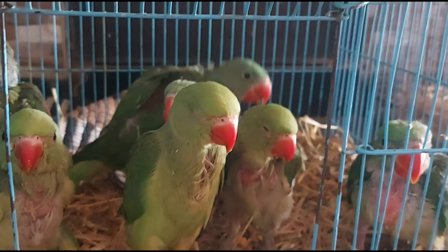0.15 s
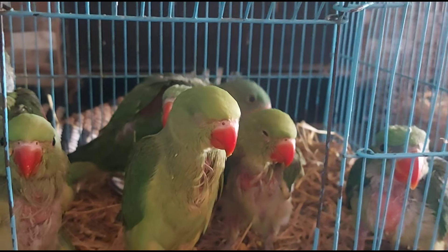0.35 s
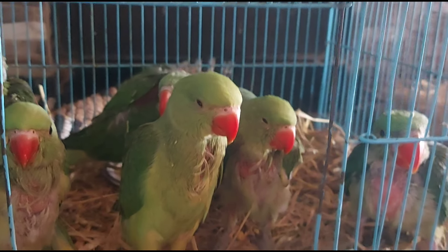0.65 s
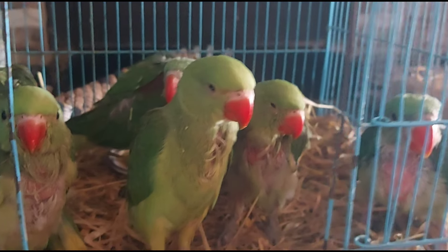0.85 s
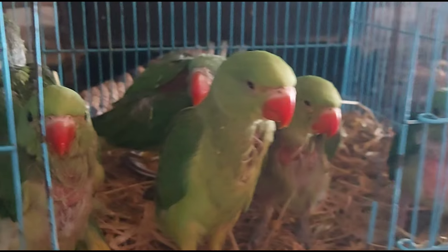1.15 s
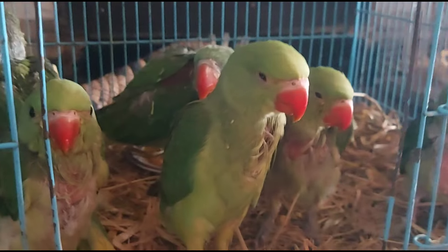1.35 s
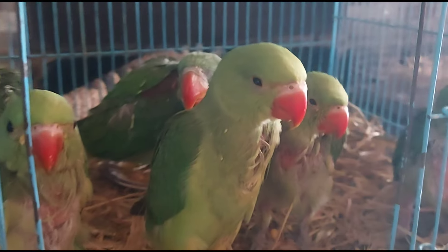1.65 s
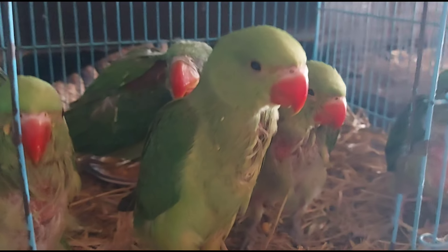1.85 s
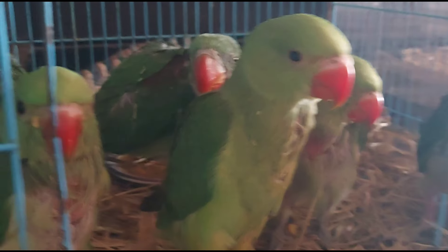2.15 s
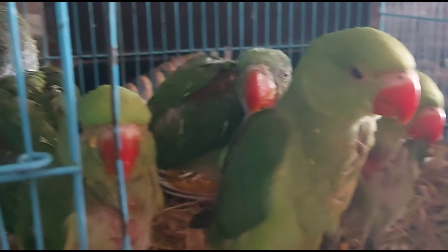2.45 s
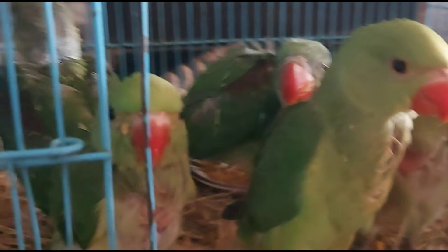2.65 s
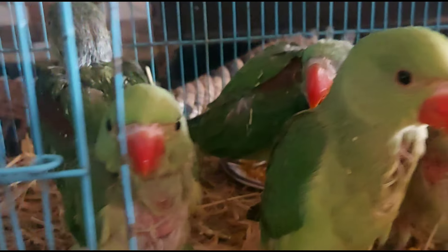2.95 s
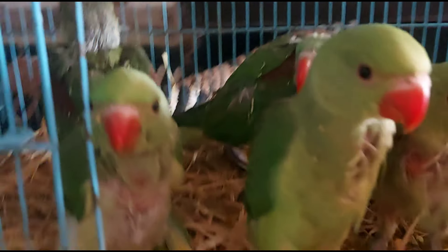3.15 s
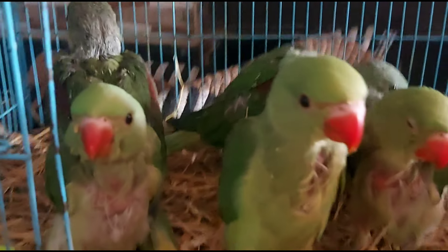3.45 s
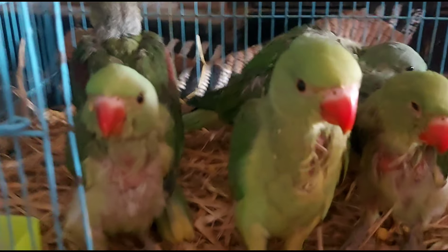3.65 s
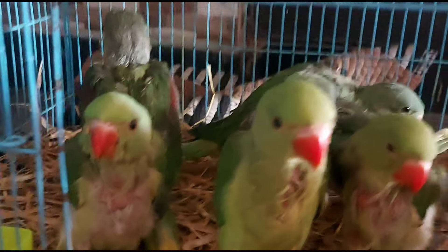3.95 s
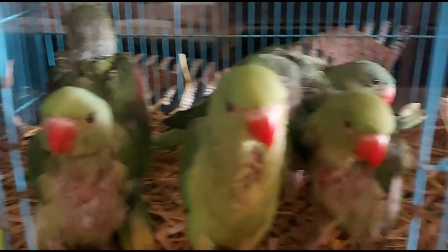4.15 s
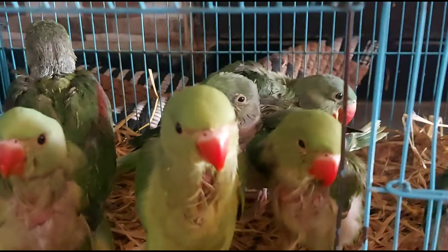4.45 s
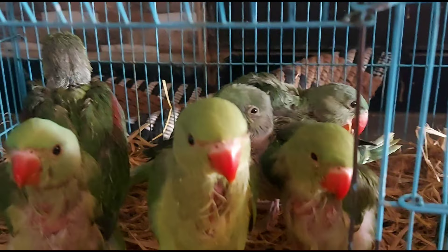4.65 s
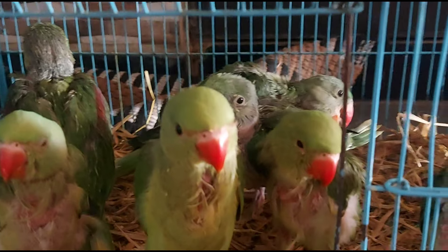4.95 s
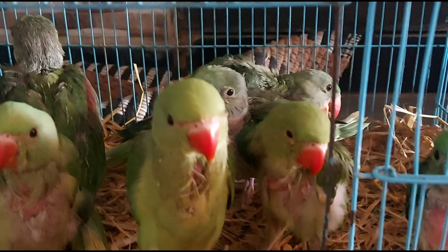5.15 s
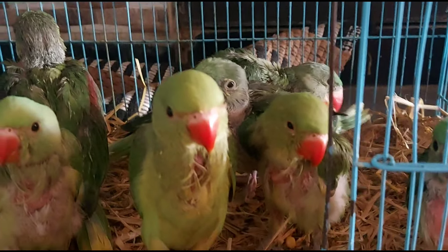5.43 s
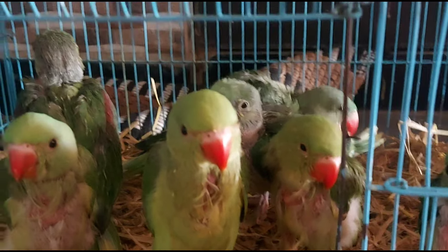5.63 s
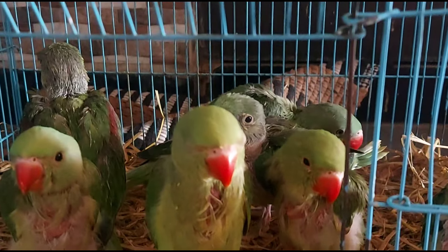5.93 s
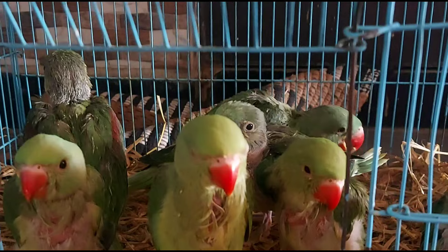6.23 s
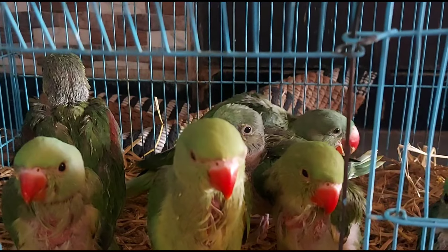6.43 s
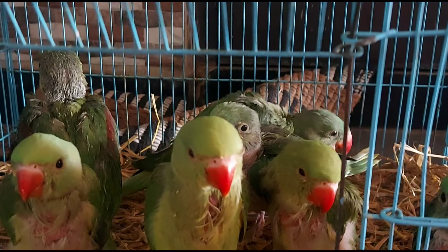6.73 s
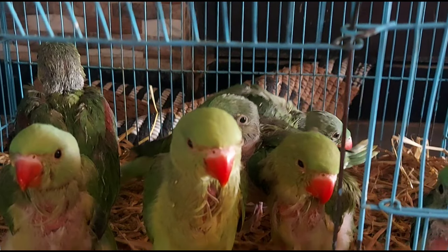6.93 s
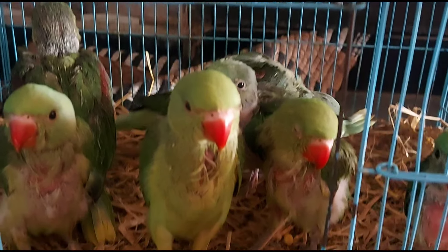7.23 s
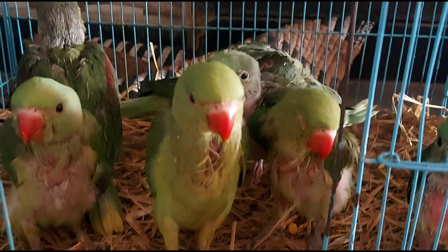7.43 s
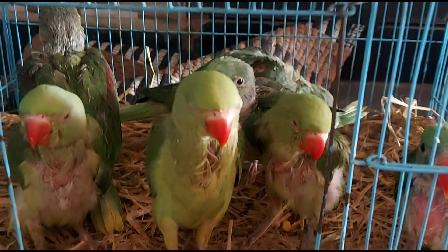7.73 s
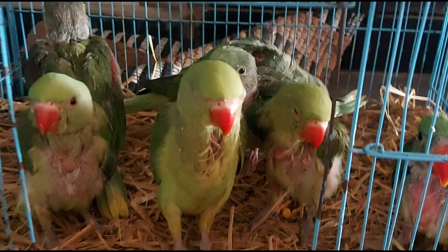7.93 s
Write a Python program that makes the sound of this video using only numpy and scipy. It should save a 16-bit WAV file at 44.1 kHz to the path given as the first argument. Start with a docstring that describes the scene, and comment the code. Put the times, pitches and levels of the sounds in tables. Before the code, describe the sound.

A low fan hum around 100 Hz with soft rushing air continues throughout a reverberant indoor room. At about 0.5, 0.75 and 1.0 seconds a parakeet farther off gives three hoarse squawks, each scooping up, holding briefly and falling, the first cracking into a yelp. From 1.4 to 3.1 seconds beaks tick lightly on the cage, with gritty little scrapes and thin wire rings, sharpest near 2.65 and 2.9, among very faint gliding peeps. Between 3.9 and 4.8 a weak, breathy two-voiced begging rasp wavers with a few more ticks. At 4.85 a close bird flicks upward into a piercing, very loud screech that slides down, followed by a shorter, softer one at 5.1. The background ducks, then creeps back. The distant three-note phrase repeats from 6.0 to 6.8, quieter and duller, leaving only wavering fan hum until about 8 seconds.

```python
"""A young parakeet close by screeches twice, and the recorder's gain ducks and creeps back.
A bird across the hard-walled room gives the same harsh three-note phrase twice.
Chicks beg and peep, beaks tick and set cage wires ringing, and a fan hums and rushes behind.
The birds' calls are stacks of harmonics coloured by a throat; ticks and air are filtered noise;
the peeps, the wires and the hum are sine waves."""
import sys
import numpy as np
from scipy import signal
from scipy.fft import rfft, irfft, next_fast_len
from scipy.io import wavfile
from scipy.ndimage import uniform_filter1d, minimum_filter1d, map_coordinates

SR = 44100
rng = np.random.default_rng(int(sys.argv[2]) if len(sys.argv) > 2 else 0)


def dump(signal):
    """Clip the signal to [-1, 1] and save it as 16-bit WAV at the path in sys.argv[1]."""
    limited = np.clip(np.atleast_2d(signal).T, -1, 1)
    pcm = np.round(limited * 32767).astype(np.int16)
    wavfile.write(sys.argv[1], SR, pcm)


N = 356636  # length of the scene in samples

# In all tables, levels are those before the room is added.
# The close bird's screeches: start_s, hold_s, fall_s, held_pitch_hz, end_pitch_hz, level_db,
# fade_over_fall_db, held_rasp (0-1)
SCREECHES = [(4.869, .047, .092, 2403, 1417, -2, 11.5, 0.05),
             (5.152, .012, .104, 2448, 1455, -7, 9.5, 0.16)]
# Quick flicks that lead into them: start_s, length_s, start_pitch_hz, end_pitch_hz, level_db, rasp (0-1)
LEAD_IN_FLICKS = [(4.822, 0.04, 827, 2475, -18, 0.66), (4.859, 0.012, 1900, 1565, -7.5, .1),
                  (5.101, 0.013, 1310, 1300, -22.5, 0.65), (5.114, 0.02, 963, 2296, -10.5, 0.4)]
# How the close bird shapes a note, clear and abrupt: named settings of held_note
CLOSE_MANNER = dict(ease=.75, scoop=0, onset_rasp=.05, settle_s=0.0055, fall_rasp=0.17, attack_s=0.0027, release_s=.008, flutter_db=1.85)
# What the close bird's throat lets through: frequency_hz, relative_level_db
CLOSE_THROAT = [(700, -1.5), (1500, -15.5), (2400, -6), (3300, 4.5), (4800, -2.5), (5400, -8), (6200, 0),
                (7300, -8.5), (8500, -8), (9700, -23), (11000, -19.5), (12200, -19.5), (13200, -41),
                (15000, -19)]


def near_bird():
    """Each screech starts with quick flicks, holds a clear note and slides down ever faster."""
    out = np.zeros((2, N))
    notes = [(start_s, held_note(*shape, **CLOSE_MANNER)) for start_s, *shape in SCREECHES]
    flicks = [(start_s, flick(*shape)) for start_s, *shape in LEAD_IN_FLICKS]
    for start_s, gesture in notes + flicks:
        note = call(gesture, CLOSE_THROAT, jitter=0.096, breath=0.22, split_db=-22, odd_db=-9.5)
        add(out, start_s, room(note, direct_db=-1.5, wet_db=-2.0, right_db=11.0, lag_s=0.00022, early=2.7))
    return out


# When the phrase is heard: start_s, level_change_db, growth_per_note_db, brightness_db_per_octave
PHRASE_REPEATS = [(.467, 1, -0.45, 1.1), (6.031, -1.5, 1.5, -1)]
# The three notes: start_in_phrase_s, hold_s, fall_s, held_pitch_hz, end_pitch_hz, level_db,
# fade_over_fall_db, held_rasp (0-1); each repeat then shifts the levels
PHRASE_NOTES = [(.001, .086, .060, 2285, 1677, -21.5, 3, .58),
                (.282, .050, .125, 2442, 1383, -24.5, 4, 0.43),
                (.541, .042, .122, 2315, 1350, -21, 5.5, 0.28)]
# The yelp that the first note cracks into: start_in_phrase_s, length_s, start_pitch_hz, end_pitch_hz
YELP = (.047, .036, 1830, 1660)
# How the far bird shapes a note, hoarse and scooping up: named settings of held_note
HOARSE_MANNER = dict(ease=1.8, scoop=.07, onset_rasp=.6, settle_s=.016, fall_rasp=.45, attack_s=0.016, release_s=0.025, flutter_db=2)
# What the far bird's throat lets through, before each repeat's brightness: frequency_hz, relative_level_db
HOARSE_THROAT = [(1000, -24), (1750, -11.5), (2300, -4), (2800, 5), (3080, 2.5), (3450, 7), (4600, -1.5),
                 (5300, -6.5), (6000, 4), (6900, -3), (7600, -2.5), (8800, -11.5), (9700, -28),
                 (11800, -15.5), (15500, -48)]


def far_bird():
    """Three harsh notes that scoop up, hold and fall, heard mostly by way of the walls."""
    out = np.zeros((2, N))
    for start_s, change_db, growth_db, bright_db in PHRASE_REPEATS:
        throat = [(hz, level_db + bright_db * np.log2(hz / 3500)) for hz, level_db in HOARSE_THROAT]
        notes = []
        for k, (note_s, *shape) in enumerate(PHRASE_NOTES):
            notes.append((note_s, change_db + k * growth_db, held_note(*shape, **HOARSE_MANNER)))
        yelp_s, *glide = YELP
        notes.append((yelp_s, change_db, flick(*glide, db=-16, rasp=0.19)))
        for note_s, note_db, gesture in notes:
            note = call(gesture, throat, jitter=0.0586, breath=0.46, split_db=-10.5, odd_db=-6.0)
            note = amp(note_db) * note
            heard = room(note, direct_db=-4.5, wet_db=-1.5, right_db=8.0, lag_s=0.0004, early=0.5)
            add(out, start_s + note_s, heard)
    return out


# A begging rasp, one voice from each side of the syrinx (a bird's voice box): time_s, relative_effort_db
LOW_VOICE = [(3.89, -43), (3.906, -38), (3.948, -31.5), (4.18, -38), (4.21, -34), (4.358, -38.5),
             (4.464, -34), (4.728, -42), (4.8, -49.5)]
HIGH_VOICE = [(3.93, -41), (4.042, -46), (4.048, -51), (4.2, -37), (4.34, -46.5), (4.392, -32.5),
              (4.53, -45)]
# What a chick's throat lets through: frequency_hz, relative_level_db
SMALL_THROAT = [(2000, -20), (2750, -12), (3150, 3), (4000, -4.5), (4700, -10.5), (5400, -21.5),
                (6600, -12), (7500, -25), (10000, -40), (11900, -24), (13000, -52)]
# Faint peeps: start_s, length_s, start_pitch_hz, end_pitch_hz, level_db
FAINT_PEEPS = [(1.625, .05, 2640, 2500, -43), (1.748, .07, 5660, 5330, -42), (1.76, .06, 6700, 6650, -45),
               (1.856, .07, 7160, 7700, -48), (1.954, .04, 6140, 5950, -44),
               (1.957, 0.057, 2630, 2540, -41.5), (2.068, 0.089, 7500, 7600, -42),
               (2.20, 0.055, 6000, 5750, -45), (2.21, .08, 2600, 2500, -40),
               (2.381, 0.048, 1860, 1700, -40), (2.516, 0.047, 5440, 5950, -41),
               (2.656, 0.062, 7400, 7900, -38), (2.76, 0.064, 6260, 6500, -44),
               (2.89, .05, 7400, 7150, -38), (3.129, 0.051, 5155, 4970, -35)]


def chicks():
    """A long two-voiced begging rasp, and thin gliding peeps."""
    out = np.zeros(N)
    low = beg(LOW_VOICE, start_hz=3210, sag_hz_per_s=100, db=-0.5, rasp=0.443, clearing_per_db=0.13)
    high = beg(HIGH_VOICE, start_hz=4100, sag_hz_per_s=280, db=-0.5, rasp=0.15, clearing_per_db=0)
    add(out, LOW_VOICE[0][0], call(low, SMALL_THROAT, jitter=0.0595, breath=0.74, split_db=-6))
    add(out, HIGH_VOICE[0][0], call(high, SMALL_THROAT, jitter=0.09, breath=0.56, split_db=-16))
    for start_s, length_s, start_hz, end_hz, db in FAINT_PEEPS:
        n = int(length_s * SR)
        pitch = np.linspace(start_hz, end_hz, n) * (1 + 0.013 * wobble(595, n))
        peep = np.sin(2 * np.pi * np.cumsum(pitch) / SR)
        add(out, start_s, amp(db) * np.hanning(n) * peep)
    return room(out, direct_db=-7.5, wet_db=0.5, right_db=18.5, lag_s=0.0003)[:, :N]


# Beaks ticking in the cage: start_s, level_db, scrape_decay_s
BEAK_TICKS = [(1.362, -30.5, 0.0099), (1.458, -37, 0.048), (1.617, -42, 0.024), (1.714, -40, 0.012),
              (1.757, -39.5, 0.017), (1.87, -41.5, 0.026), (1.957, -36, 0.014), (2.056, -44, 0.14),
              (2.195, -34, 0.022), (2.339, -41.5, 0.024), (2.415, -42, 0.017), (2.526, -34.5, 0.029),
              (2.648, -27, 0.014), (2.757, -36, .02), (2.79, -42, .015), (2.88, -25.5, 0.01),
              (3.125, -33.5, 0.018), (3.853, -37, 0.059), (4.491, -38, 0.016), (4.571, -40, 0.025),
              (4.68, -37.5, 0.018)]
# Colour of the scrape: frequency_hz, relative_level_db
SCRAPE_COLOUR = [(1200, -33), (2200, 5), (2650, 7), (3100, 0), (5000, 3.5), (7600, 4), (9200, -5),
                 (12000, 4), (16000, -6)]
# Cage wires, varied a little from tick to tick: pitch_hz, relative_level_db, time_to_fall_60_db_s
CAGE_WIRES = [(2610, -6, 0.19), (2645, -1, 0.15), (3120, -2, 0.1), (3740, -8, 0.23), (5960, -14, .2),
              (6030, -9.5, 0.203), (6600, -9, 0.18), (7400, -4.5, 0.22), (7800, -11, 0.22),
              (12200, -22.5, .12)]


def beaks():
    """Each tick is a brief gritty scrape that sets the wires ringing and wakes the room."""
    out = np.zeros((2, N))
    t = np.arange(SR // 4) / SR
    for start_s, db, decay_s in BEAK_TICKS:
        grit = noise(SCRAPE_COLOUR, len(t)) * amp(3.1 * wobble(600, len(t))) * np.exp(-t / decay_s)
        ring = np.zeros(len(t))
        for hz, level_db, t60 in CAGE_WIRES:
            decay = amp(level_db + rng.normal(0, 5.8) - 60 * t / t60)
            ring += decay * np.sin(2 * np.pi * hz * rng.normal(1, 0.0143) * t)
        # hard ticks add mostly crack: in dB, the ring grows only half as fast
        tick = amp(db) * grit + amp(db / 2 - 27.0) * ring
        tick *= 1 - np.exp(-t / 0.00048)  # soften the very start
        add(out, start_s, room(tick, direct_db=-5, wet_db=1, right_db=7.5, lag_s=0.0005))
    return out


# Fan motor tones, before swell and wobble: pitch_hz, level_db
MOTOR_HUM = [(100, -38.5), (199.6, -50.5), (299.8, -48)]
# The hum drifts as the microphone moves through the room: time_s, level_change_db
HUM_DRIFT = [(0, 1.5), (1.2, -1), (1.7, -5.5), (2.6, 0.5), (4.4, 0), (5.3, 0.5), (6.7, 1.5), (7.3, -1.5),
             (8.1, -6)]
# Colour of the fan's rush: frequency_hz, relative_level_db
AIR_RUSH = [(15, -82.5), (25, -45), (32, -39), (49, -11), (92, -1.5), (110, -5.5), (128, -12.5),
            (198, -11.5), (243, -12.5), (297, -8), (437, -14), (470, -14), (830, -11), (1460, -19),
            (2000, -27.5), (2600, -35), (4400, -120)]
# Colour of a brighter hiss: frequency_hz, relative_level_db
BRIGHT_HISS = [(880, -20), (1500, -7.5), (1780, -1.5), (2880, -4.5), (3730, -9), (4160, -11), (7920, -14),
               (9370, -26), (13100, -17), (16000, -29)]
# How alike the noise is on left and right: frequency_hz, likeness (1 is identical, 0 unrelated)
LEFT_RIGHT_LIKENESS = [(30, 0.51), (80, 0.95), (150, 0.95), (280, 0.81), (550, 0.52), (1100, -0.13),
                       (2500, -0.076)]
# Balance of hum and noise, mostly leaning right: frequency_hz, left_minus_right_db
LEFT_RIGHT_LEAN = [(60, -0.5), (110, -2.5), (200, -0.5), (380, -0.5), (700, -1.0), (1290, -1.0),
                   (2380, -1.5), (4400, -5.5), (8120, -8.5), (15000, 4)]


def fan():
    """Motor hum is a few wavering sines; rushing air is noise, most alike left and right in the bass."""
    t = np.arange(N) / SR
    drift_s, drift_db = np.transpose(HUM_DRIFT)
    swell_db = np.interp(t, drift_s, drift_db)
    hum = np.zeros(N)
    for hz, db in MOTOR_HUM:
        level = amp(db + swell_db + 2.44 * wobble(4.4, N))
        hum += level * np.sin(2 * np.pi * hz * t + 0.27 * wobble(5, N))

    def angle(hz):
        """Mixing angle between the shared and opposed noise that gives the wanted likeness."""
        return np.arccos(np.clip(along(LEFT_RIGHT_LIKENESS, hz), -1, 1)) / 2

    shared, opposed = [amp(-35.5) * noise(AIR_RUSH, N) + amp(-44.0) * noise(BRIGHT_HISS, N)
                       for _ in range(2)]
    shared = filtered(shared, lambda hz: np.cos(angle(hz))) + hum
    opposed = filtered(opposed, lambda hz: np.sin(angle(hz)))
    stereo = np.array([shared + opposed, shared - opposed])
    return filtered(stereo, lambda hz: amp(np.outer([0.5, -0.5], along(LEFT_RIGHT_LEAN, hz))))


# How long the echo lasts: frequency_hz, time_to_fall_60_db_s
ECHO_TIME = [(300, 0.37), (3200, 0.64), (5000, 0.54), (7500, 0.5), (14000, 0.35)]


def room(x, direct_db, wet_db, right_db, lag_s, early=0.86):
    """Direct sound, louder on the right but earlier on the left, plus cage, floor and wall echoes."""
    hz, t, z = signal.stft(rng.standard_normal((2, int(0.7 * SR))), SR, nperseg=256)
    decay = amp(-60 * t / along(ECHO_TIME, hz)[:, None])
    # cage and floor answer early, the walls with a diffuse tail
    swell = (1 - np.exp(-t / 0.0014)) * (1 + early * np.exp(-t / 0.021))
    tail = signal.istft(z * decay * swell, SR, nperseg=256)[1]
    tail /= np.linalg.norm(tail[0])
    out = amp(wet_db) * signal.fftconvolve(x[None], tail, axes=1) * amp([[-1.2], [1.2]])
    add(out[0], 0, amp(direct_db - right_db / 2) * x)
    add(out[1], lag_s, amp(direct_db + right_db / 2) * x)
    return out


def call(gesture, throat, jitter, breath, split_db, odd_db=-6):
    """One note: syrinx harmonics through the throat; rasp shakes the pitch and adds turbulence."""
    pitch, size, rasp = gesture
    n = len(pitch)
    tension = np.clip((pitch - 2000) / 400, 0, 1)
    pitch = pitch * (1 + jitter * rasp * (wobble(1100, n) + 0.285 * wobble(120, n)))
    phase = 2 * np.pi * np.cumsum(pitch) / SR
    voice = np.zeros(n)
    for k in np.arange(2, 16) / 2:  # multiples 1, 1.5, 2 ... 7.5 of the pitch
        if k % 1:  # under tension alternate cycles differ: lines halfway between the harmonics
            weight = amp(split_db) * tension
        elif k > 1 and k % 2:  # under tension odd overtones weaken
            weight = amp(odd_db * tension)
        else:
            weight = 1
        audible = k * pitch < SR / 2
        voice += weight * gain(throat, k * pitch) * audible * np.sin(k * phase)
    voice = unit(voice) * (1 + 0.5 * rasp * wobble(502, n))
    share = np.clip(breath * rasp ** 2, 0, 1)  # part of the power that is breath noise
    return size * (np.sqrt(1 - share) * voice + np.sqrt(share) * noise(throat, n))


def held_note(hold_s, fall_s, top_hz, end_hz, db, fade_db, rasp, ease, scoop, onset_rasp, settle_s,
              fall_rasp, attack_s, release_s, flutter_db):
    """Pitch, size and rasp of a note that starts rough, settles, holds, then slides down and weakens."""
    t = np.arange(0, hold_s + fall_s, 1 / SR)
    # 0 while held, 1 at the end; with ease under 1 the slide speeds up, over 1 it levels off
    fall = 1 - np.clip(1 - (t - hold_s) / fall_s, 1e-6, 1) ** ease
    onset = np.exp(-t / settle_s)
    pitch = (top_hz + (end_hz - top_hz) * fall) * (1 - scoop * onset)  # scoop: starts under pitch
    level_db = db - fade_db * fall ** 0.45 + flutter_db * wobble(94.4, len(t))
    size = amp(level_db) * gate(t, attack_s, release_s)
    return pitch, size, np.clip(rasp + (fall_rasp - rasp) * fall + onset_rasp * onset, 0, 1)


def flick(length_s, start_hz, end_hz, db, rasp):
    """Pitch, size and rasp of a quick glide that swells and dies."""
    n = int(length_s * SR)
    return np.linspace(start_hz, end_hz, n), amp(db) * np.sin(np.linspace(0, np.pi, n)), rasp


def beg(effort, start_hz, sag_hz_per_s, db, rasp, clearing_per_db, wander=0.00816):
    """Pitch, size and rasp of a long sagging note; clearing_per_db adds rasp where effort drops."""
    effort_s, effort_db = np.transpose(effort)
    t = np.arange(0, effort_s[-1] - effort_s[0], 1 / SR)
    effort_db = np.interp(t + effort_s[0], effort_s, effort_db)
    pitch = (start_hz - sag_hz_per_s * t) * (1 + wander * wobble(14, len(t)))
    size = amp(effort_db + db) * gate(t, attack_s=0.024, release_s=0.05)
    return pitch, size, np.clip(rasp + clearing_per_db * (effort_db.max() - effort_db), 0, 1)


def gate(t, attack_s, release_s):
    """Smooth rise at the start and fall at the end of the times t."""
    rise = np.sin(np.pi / 2 * np.clip(t / attack_s, 0, 1))
    return rise * np.sin(np.pi / 2 * np.clip((t[-1] - t) / release_s, 0, 1))


def amp(db):
    """Amplitude factor of a level in dB."""
    return 10 ** (np.asarray(db) / 20)


def unit(x):
    """x scaled to an rms of 1."""
    return x / np.sqrt(np.mean(x ** 2) + 1e-20)


def along(points, hz):
    """Read a (frequency_hz, value) table at hz, on a log frequency axis."""
    f, v = np.transpose(points)
    return np.interp(np.log(np.abs(hz) + 1), np.log(f + 1), v)


def gain(spectrum, hz):
    """Gain of a (frequency_hz, level_db) table that falls away below its first point."""
    return amp(along(spectrum, hz)) * np.minimum(hz / spectrum[0][0], 1) ** 2


def wobble(rate, n):
    """A smooth random curve of n samples, with rate random points a second."""
    return map_coordinates(rng.standard_normal(int(n * rate / SR) + 4), [np.arange(n) * rate / SR])


def filtered(x, response):
    """x with each frequency scaled by response(hz)."""
    n = x.shape[-1]
    m = next_fast_len(n + 8192)
    return irfft(rfft(x, m) * response(np.fft.rfftfreq(m, 1 / SR)), m)[..., :n]


def noise(spectrum, n):
    """Coloured noise of rms 1."""
    return unit(filtered(rng.standard_normal(n), lambda hz: gain(spectrum, hz)))


def add(track, start_s, x):
    """Mix x into the track at start_s, cutting what runs past the end."""
    part = track[..., round(start_s * SR):][..., :x.shape[-1]]
    part += x[..., :part.shape[-1]]


def scene():
    """All the birds, the ticking cage and the fan together."""
    return near_bird() + far_bird() + chicks() + beaks() + fan()


def gain_control(x, threshold_db, slope, range_db, hold_s, release_db):
    """Loud sound pulls the gain down at once; after a hold it creeps back by release_db a second."""
    power = uniform_filter1d(np.mean(x ** 2, axis=0), size=700)
    level_db = 10 * np.log10(np.abs(power) + 1e-12)
    wanted_db = np.clip(slope * (threshold_db - level_db), -range_db, 0)
    half = int(hold_s * SR / 2)
    # the lowest gain wanted during the past hold_s
    held_db = minimum_filter1d(wanted_db, 2 * half + 1, origin=half, mode="nearest")
    creep = release_db * np.arange(N) / SR
    return x * amp(np.minimum.accumulate(held_db - creep) + creep)


def record(dry):
    """Gain control, soft clipping at full scale and the band limit."""
    held = gain_control(dry, threshold_db=-17.5, slope=0.54, range_db=10.0, hold_s=0.83, release_db=6.5)
    rounded = held / (1 + held ** 8) ** (1 / 8)
    return filtered(rounded, lambda hz: hz < 15900)


dry = scene()
out = record(dry)
dump(out)
```